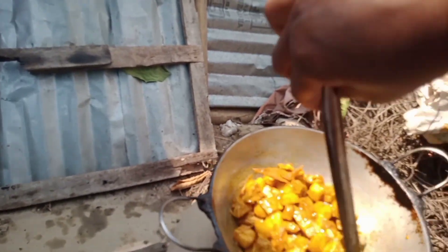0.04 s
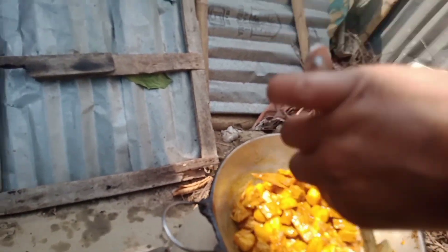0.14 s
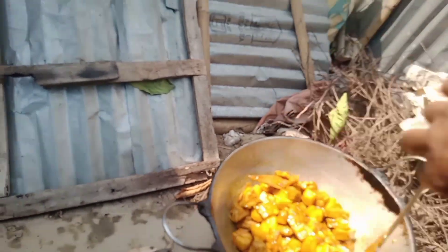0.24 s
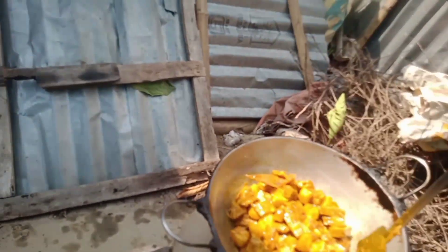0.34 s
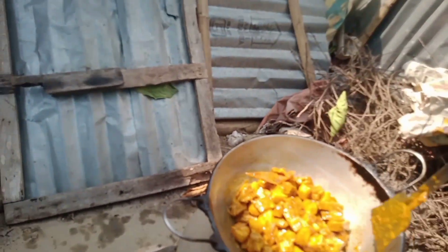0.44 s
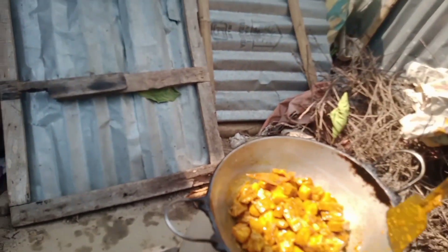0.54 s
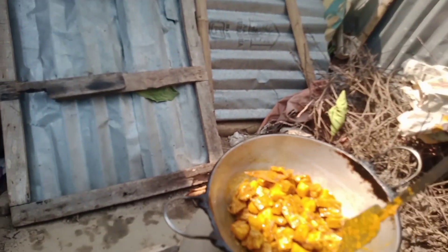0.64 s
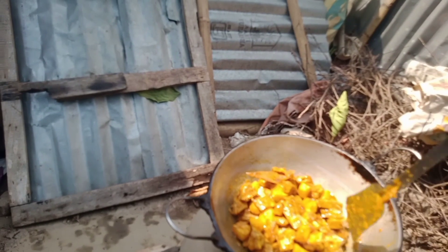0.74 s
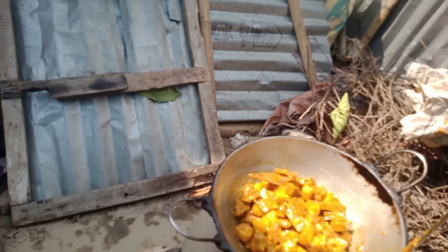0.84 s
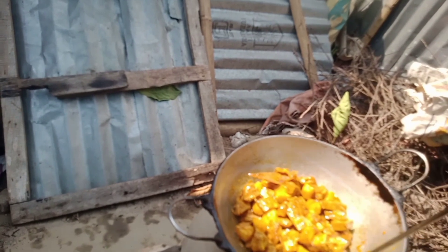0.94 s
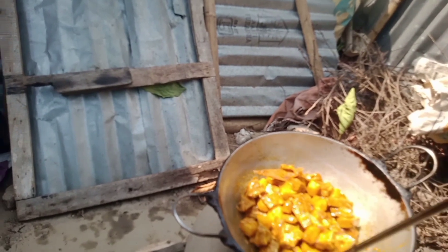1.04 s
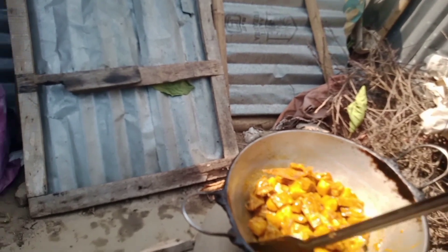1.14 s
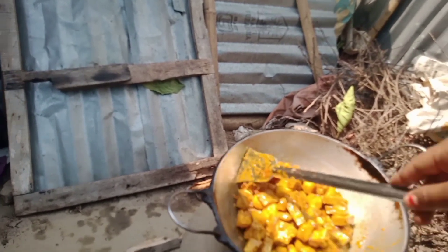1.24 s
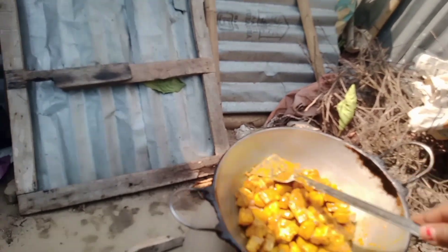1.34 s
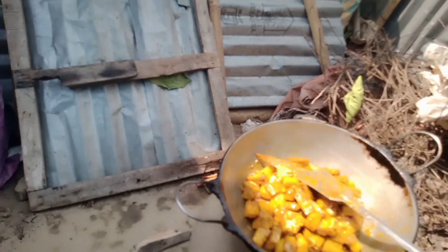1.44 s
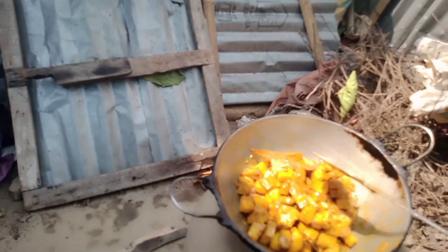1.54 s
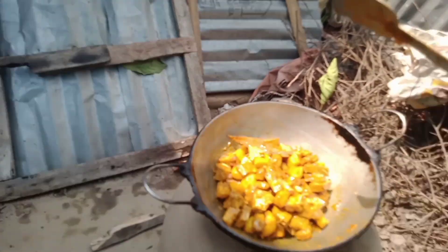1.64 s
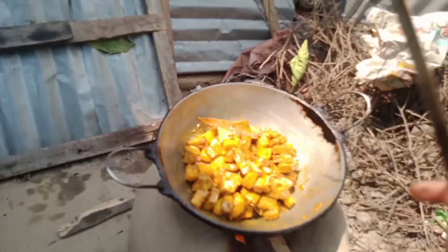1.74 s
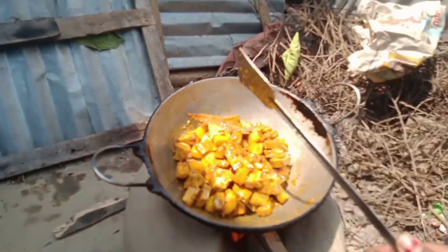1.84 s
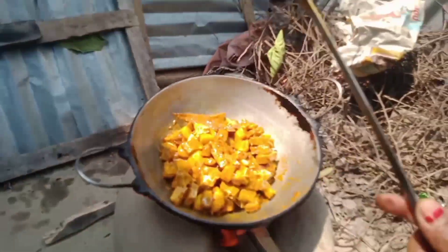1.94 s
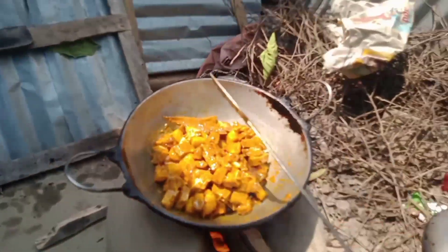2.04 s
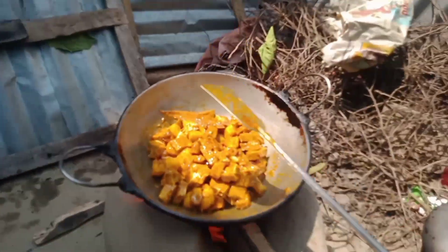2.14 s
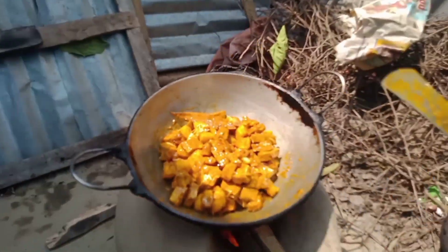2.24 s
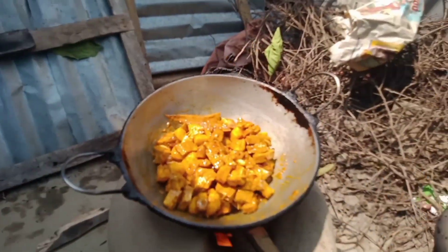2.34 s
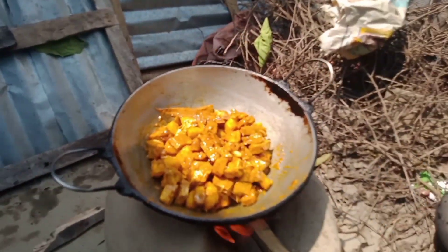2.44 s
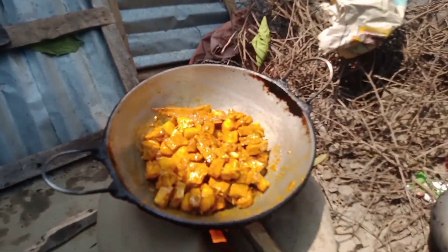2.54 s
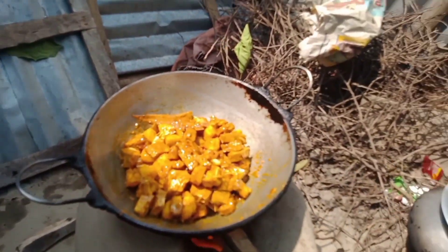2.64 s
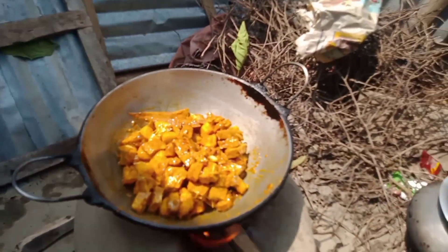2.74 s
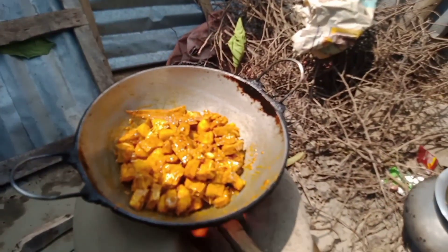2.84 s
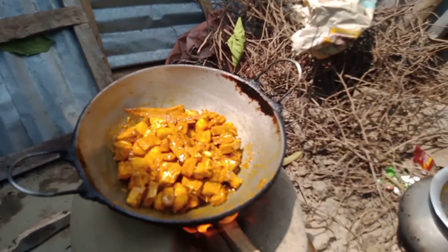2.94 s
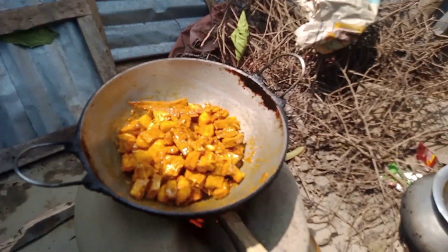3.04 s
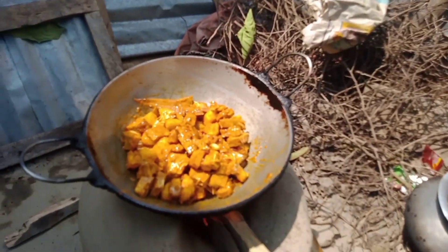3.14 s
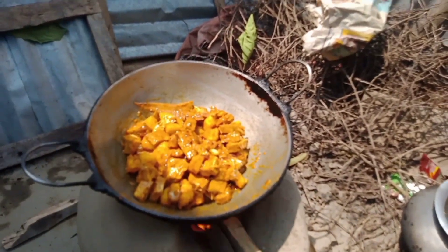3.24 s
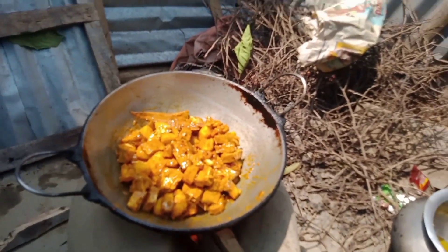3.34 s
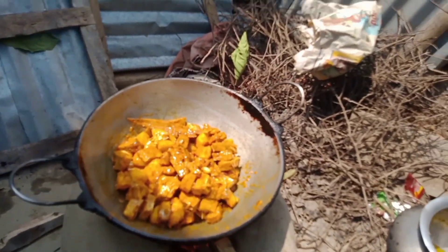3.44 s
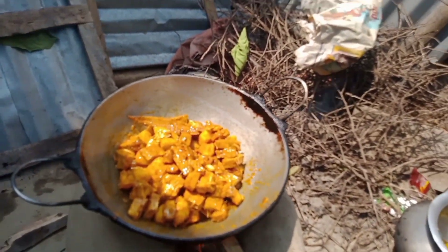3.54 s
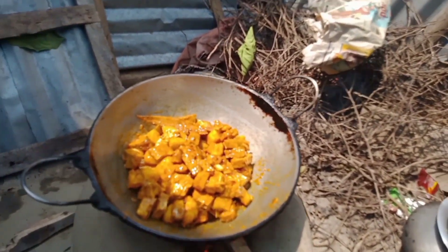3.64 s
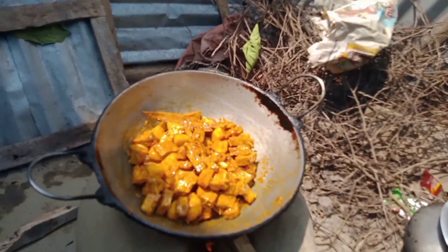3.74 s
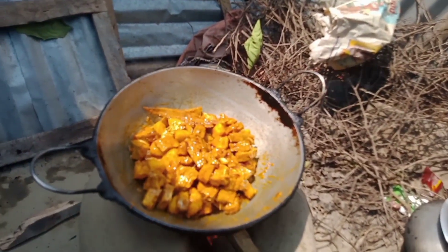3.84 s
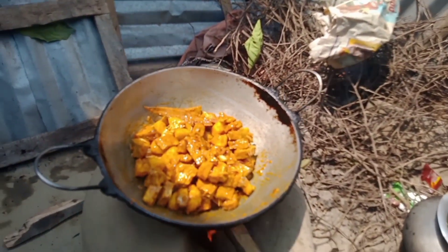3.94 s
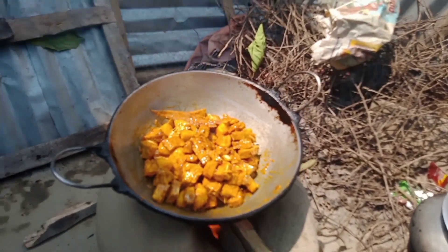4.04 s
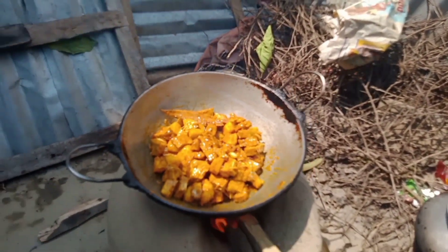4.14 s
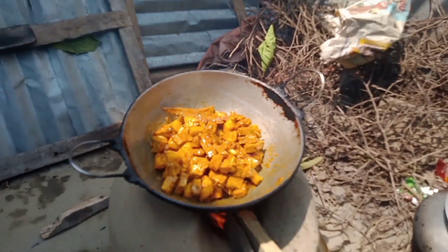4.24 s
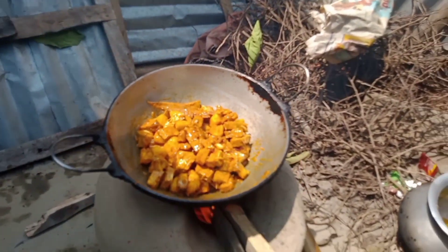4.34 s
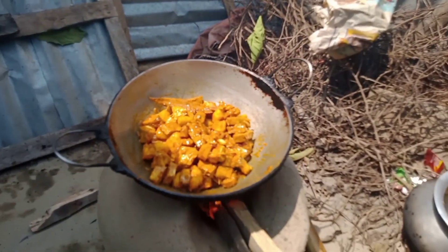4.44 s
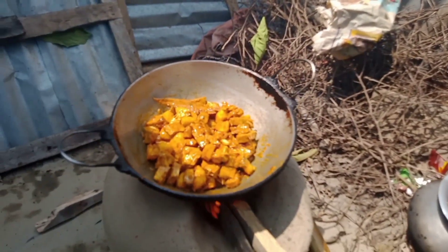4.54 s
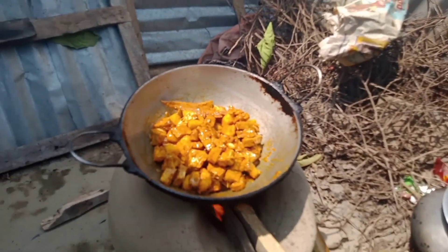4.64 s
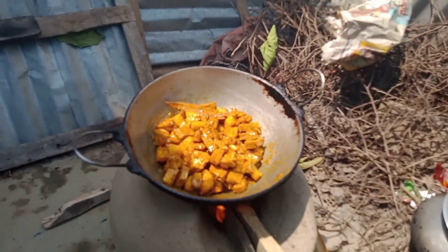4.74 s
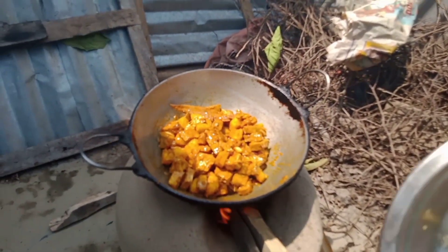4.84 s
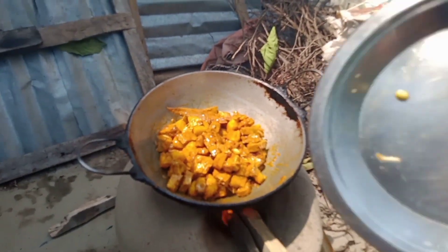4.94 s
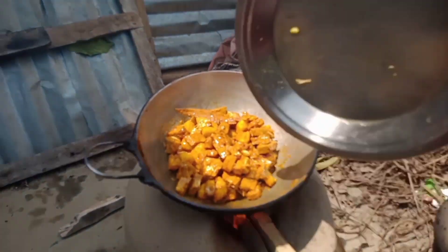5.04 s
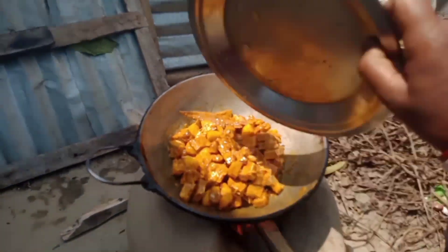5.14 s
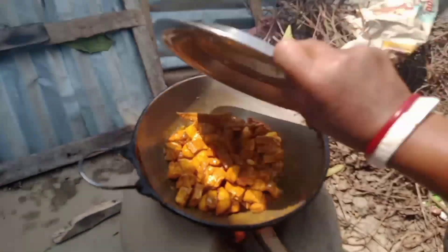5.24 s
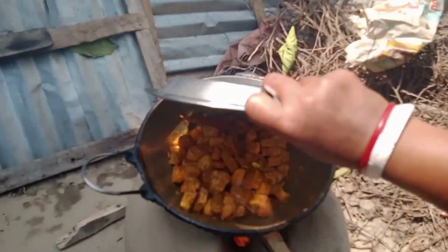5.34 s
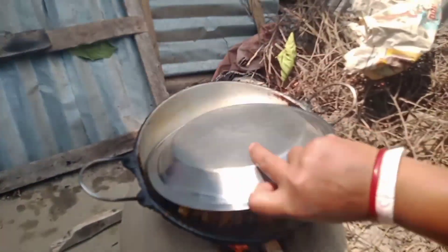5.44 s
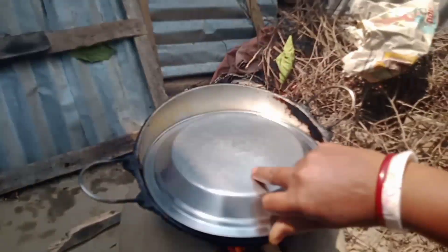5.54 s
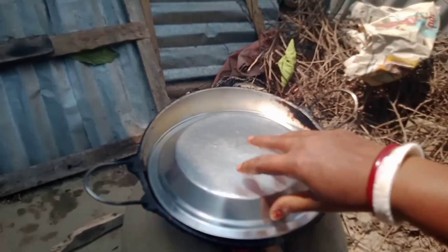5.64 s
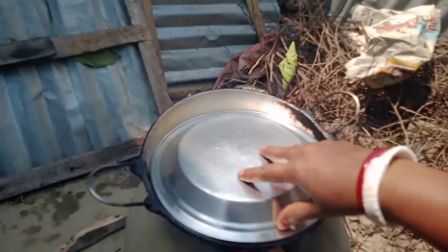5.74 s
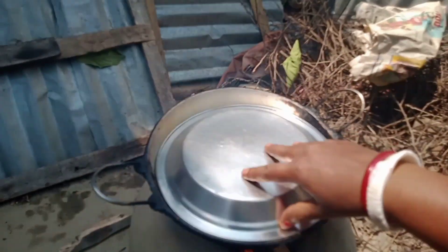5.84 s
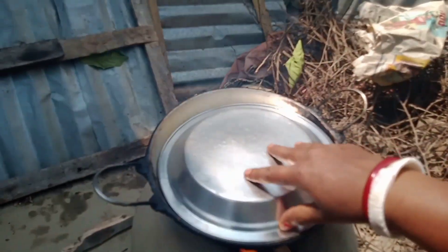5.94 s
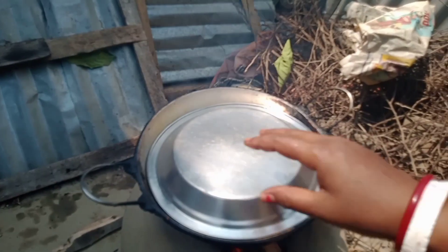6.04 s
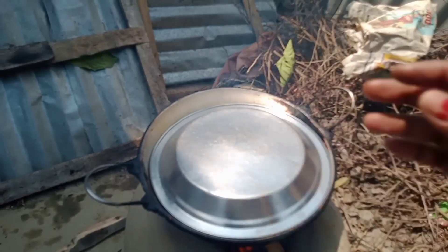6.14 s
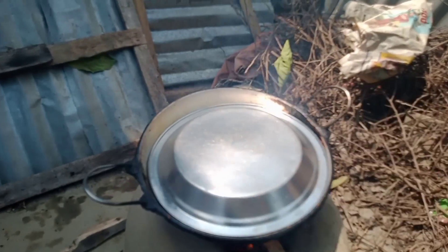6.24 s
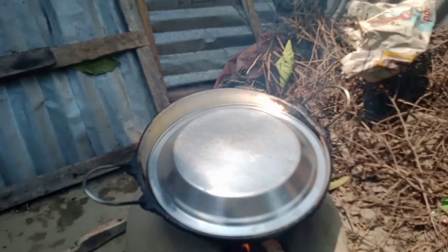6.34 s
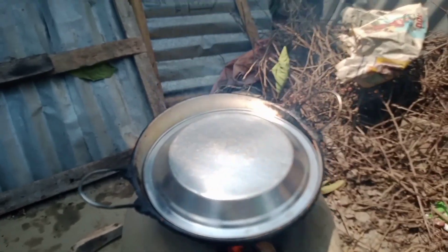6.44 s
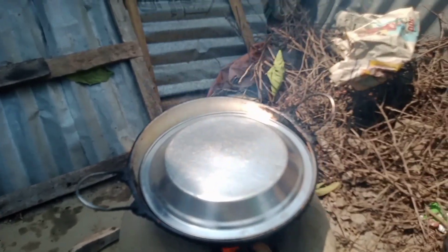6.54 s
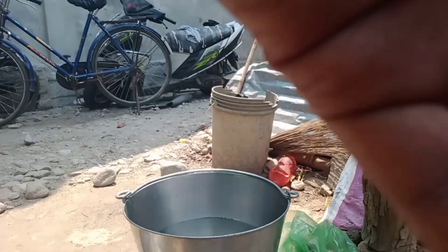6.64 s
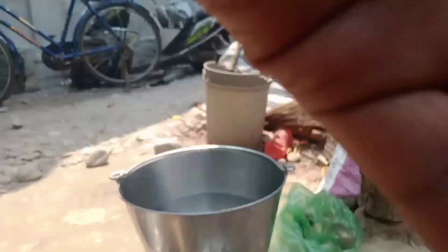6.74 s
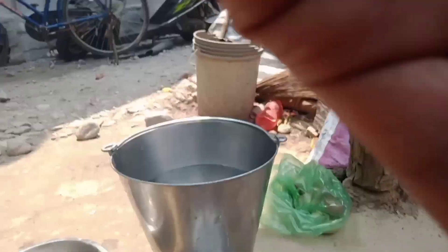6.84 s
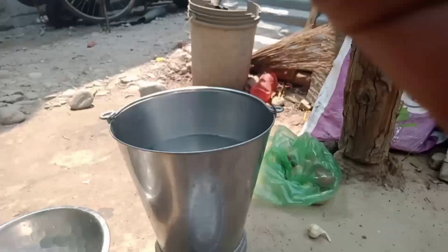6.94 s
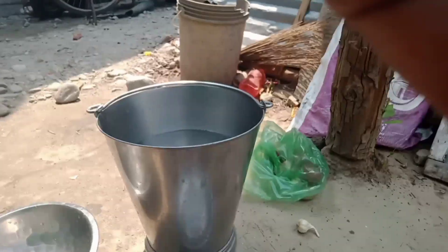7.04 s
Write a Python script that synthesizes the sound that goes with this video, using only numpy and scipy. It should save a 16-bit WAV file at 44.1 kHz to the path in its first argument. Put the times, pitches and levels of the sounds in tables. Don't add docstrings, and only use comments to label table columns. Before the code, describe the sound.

Outdoors, close and dry in mono, vegetables fry in a thin metal pan with a dense, crackling mid-bright sizzle over faint low fire and yard air. From 0 to about 1.6 seconds a spatula makes short scrapes, ticks and dull knocks, with frequent oil pops and a sharper freshly stirred hiss at the start. The frying then runs steadily, with tiny bright snaps, a small scrape and knock near 2.95 and a soft thud near 4.3. At 5.44 a metal plate knocks down; around 5.68-5.74 its edge drops, rocks rapidly and seats with short rings. The sizzle becomes quieter, hollow and resonant. From 5.8 to 6.65 a small bird gives eight short downward chips, generally getting lower. Everything cuts out at 6.67 for a tenth of a second, then a fuller, nearer hollow sizzle quickly fades in, with pops, a low thump near 6.97 and a tick near 7.1.

```python
import sys
import numpy as np
from scipy import signal
from scipy.fft import rfft, irfft, next_fast_len
from scipy.io import wavfile

SR = 44100
rng = np.random.default_rng(int(sys.argv[2]) if len(sys.argv) > 2 else 0)


def store_wav(level_fs):
    pcm = np.round(np.clip(np.atleast_2d(level_fs), -1, 1) * 32767)
    wavfile.write(sys.argv[1], SR, pcm.T.astype(np.int16))


def field_ratio(decibels):
    return 10 ** (np.asarray(decibels, dtype=float) / 20)


N = 312669
CUT_S, BACK_S = 6.6745, 6.78


def in_time(rows):
    s, *columns = np.transpose(rows)
    return [np.interp(np.arange(N) / SR, s, c) for c in columns]


def rms_one(x):
    return x / np.sqrt(np.mean(x ** 2) + 1e-20)


def add(out, s, x):
    i = round(s * SR)
    out[i:i + len(x)] += x[:N - i]


def swells(rows):
    out = np.zeros((len(rows[0]) - 2, N))
    for s, length_s, *db in rows:
        shape = np.hanning(round(length_s * SR)) ** 0.23
        for curve, top_db in zip(out, db):
            add(curve, s, top_db * shape)
    return out


def drift(rate_hz):
    step, settle = 40, 2000
    r = np.exp(-80 * np.pi * rate_hz / SR)
    noise = rng.standard_normal(N // step + settle + 2)
    slow = signal.lfilter([1], [1, -2 * r, r * r], noise)[settle:]
    return np.interp(np.arange(N) / step, np.arange(len(slow)), rms_one(slow))


def colour(x, spectrum, lo_hz, hi_hz):
    size = next_fast_len(N)
    hz = np.maximum(np.fft.rfftfreq(size, 1 / SR), 1)
    point_hz, point_db = np.transpose(spectrum)
    gain = field_ratio(np.interp(np.log(hz), np.log(point_hz), point_db))
    inside = (hz > lo_hz) & (hz < hi_hz)
    gain = gain / np.sqrt(np.sum(gain[inside] ** 2) / len(hz))
    return irfft(rfft(x, size) * gain, size)[:N]


def clicks(per_s, spread_db):
    out = np.zeros(N)
    born = np.flatnonzero(rng.random(N, np.float32) < per_s / SR)
    chance = rng.random(N, np.float32)[born] * 2 - 1
    size_db = spread_db * np.minimum(-np.log(abs(chance) + 1e-9), 4.5)
    out[born] = field_ratio(size_db) * np.sign(chance)
    return rms_one(out)


def hollow(x, modes):
    out, probe = x.copy(), 1 + np.zeros(512, complex)
    for hz, width_hz, level_db in modes:
        r = np.exp(-np.pi * width_hz / SR)
        b = field_ratio(level_db) * (1 - r * r) / 2 * np.array([1, 0, -1])
        a = [1, -2 * r * np.cos(2 * np.pi * hz / SR), r * r]
        out += signal.lfilter(b, a, x)
        probe += signal.freqz(b, a, np.linspace(1400, 4500, 512), fs=SR)[1]
    return out / np.sqrt(np.mean(np.abs(probe) ** 2))


def strike(hits, modes):
    out, t = np.zeros(N), np.arange(SR // 3) / SR
    for s, peak_db, contact_ms in hits:
        luck_db = rng.normal(0, 2.5, len(modes))
        ring = 0
        for (hz, db, t60_s), d in zip(modes, luck_db):
            softness = 1 + (hz * contact_ms / 1000) ** 2
            ring = ring + field_ratio(db + d) / softness * np.sin(2 * np.pi * hz * t) * field_ratio(-60 * t / t60_s)
        add(out, s, field_ratio(peak_db - 8) * ring * (1 - np.exp(-t * 300 / contact_ms)))
    return signal.sosfilt(signal.butter(3, 160, "high", fs=SR, output="sos"), out + 1e-18)


def ring_once(out, s, peak_db, hz, rise_s, t60_s):
    t = np.arange(SR // 2) / SR
    swell = np.sin(np.pi / 2 * np.minimum(t / rise_s, 1)) ** 2
    decay = field_ratio(-60 * np.maximum(t - rise_s, 0) / t60_s)
    add(out, s, field_ratio(peak_db) * swell * decay * np.sin(2 * np.pi * hz * t))


def fade_in_db():
    end_s, db_per_s, knee_s = 6.872, 421, 0.0049
    t = np.arange(N) / SR
    return -db_per_s * knee_s * np.logaddexp(0, (end_s - t) / knee_s)


def spatter(big_db, fine_db, finest_db):
    out, edges_hz = 0, 150 * 2 ** np.arange(0, 6.8, 1 / 3)
    surge_db = 0.067 * drift(4.8) + 1.0 * drift(100)
    cracks = clicks(250, spread_db=6.5)
    for low, high in zip(edges_hz, edges_hz[1:]):
        hz = np.sqrt(low * high)
        log_hz = np.log(hz)
        band = signal.butter(2, [low, high], "band", fs=SR, output="sos")
        bed = clicks(1.2 * hz * (1 + .17 * drift(40)), spread_db=3.0)
        single = clicks(.02 * hz, spread_db=0.5)
        single_share = np.interp(log_hz, np.log([500, 2500, 10000]), [.3, .45, .4])
        crack_share = np.interp(log_hz, np.log([600, 3000, 12000]), [.15, .35, .45])
        size = np.interp(log_hz, np.log([900, 1400, 3500, 7000, 12000]), [0, 1, 1, 2, 3])
        size_db = 0
        for k, curve_db in enumerate([big_db, 0, fine_db, finest_db]):
            size_db = size_db + max(1 - abs(size - k), 0) * curve_db
        bursts = bed + single_share * single + crack_share * cracks
        out = out + field_ratio(surge_db + size_db + 0.52 * drift(2.3)) * signal.sosfilt(band, bursts)
    return rms_one(out)


def sizzle():
    # (time [s], share [0-1])
    cover = [
        (5.42, 0.),
        (5.55, .3),
        (5.68, .4),
        (5.76, 1.),
    ]
    # (time [s], level [dB])
    fry = [(0, -38.5), (.2, -41), (.4, -42), (.9, -40), (1.25, -42.5), (1.55, -39), (1.84, -43.5),
           (2.37, -45), (2.7, -42.5), (3.1, -43), (3.79, -41), (4.4, -42), (5.1, -42), (5.5, -41.5),
           (5.66, -47), (5.8, -48.5), (6.3, -48.5), (6.67, -45.5)]
    # (start [s], length [s], louder [dB], finer [dB], coarser [dB])
    spells = [(0, 0.055, 0.5, 2, 1), (.09, 0.06, 2.5, -2.5, 0.5), (0, 0.3, 1, 1.5, -1),
              (.3, 0.13, 1.5, -3.5, -1.5), (.4, 0.24, 0, -1, -2), (.5, 0.35, 0.5, -1, -3.5),
              (.78, 0.22, .5, -1.5, -3), (1.105, 0.077, 3.5, -1.5, 1.5), (.21, .1, 0, 1, 1),
              (6.36, 0.097, 2.5, -2.5, -2.5), (6.5, 0.14, 1, -1, -3.5), (1.31, 0.23, -1.5, 3.5, 3.5),
              (1.42, 0.28, 0, 0.5, -0.5), (1.49, 0.043, 1, -0.5, -2), (2.2, 0.23, 0.5, -0.5, -2),
              (2.7, 0.13, 0.5, 1.5, 0.5), (2.92, 0.096, 1.5, -1, 6.5), (3.2, 0.2, 0.5, 1.5, 1.5),
              (3.84, 0.29, 1, -0.5, 0.5), (4.9, 0.13, 1, 0.5, 1), (5.08, 0.17, -2, 0, 2),
              (5.5, .1, -2, -2, 2.5), (5.77, 0.33, 1.5, -1, -1.5), (6.45, 0.12, 0, -0.5, -1),
              (6.8, 0.06, 2, -0.5, 2.5), (6.87, 0.04, -1, 0, 4.5), (6.91, 0.085, 1, 1.5, 2.5)]
    # (frequency [Hz], density [dB])
    open_spectrum = [(150, -57.5), (250, -16.5), (518, -11), (672, -3.5), (1070, -2), (1320, -1.5),
                     (1630, -3), (1780, -1.5), (2150, -1), (2790, -3.5), (3680, -4.5), (5880, -19),
                     (8610, -29), (10800, -38), (12400, -38.5), (13600, -40), (15000, -34.5),
                     (15450, -31.5)]
    shut_spectrum = [(120, -27), (200, -7), (350, -2), (800, -12), (1060, -7.5), (1290, -11.5), (1640, -2),
                     (2200, -5.5), (3500, -7.5), (6000, -21), (7600, -27), (8800, -27), (12300, -46.5),
                     (15000, -39), (15450, -38.5)]
    near_spectrum = [(120, -39), (200, -13), (706, -25), (1060, -3.5), (1490, -17), (1670, -10.5),
                     (2990, -11.5), (3340, -9), (3660, -16.5), (5370, -26.5), (15800, -47.5)]
    # (frequency [Hz], width [Hz], level [dB])
    bowl_air = [(706, 234, -3.5), (1216, 600, -5.5), (1800, 320, -1.5), (2244, 500, -3.5), (3130, 1040, -1),
                (8640, 590, -1)]
    # (frequency [Hz], width [Hz], level over edge leak [dB])
    lid_air = [(346, 100, -0.5), (1040, 150, 6.5), (1636, 104, 2.5), (2243, 79, 5), (2830, 170, 4.5),
               (3386, 104, 5.5), (4000, 110, -0.5), (4650, 120, -3), (5200, 130, -3.5), (5830, 110, -3),
               (6500, 109, -1)]
    near_air = [(351, 40, 11.5), (1088, 59, 2), (1750, 67, 4.3), (2330, 210, 8.6), (2960, 180, 11.7),
                (3700, 230, 11), (4160, 190, 9), (4670, 120, 4.1), (6000, 70, 4), (6600, 63, 4)]
    near_db, calm_db = -35.5, -43
    big_yield = 0.77
    sizes_db = (1.5, 1, 5), (3, -1, 0), (1, 0.5, -1.5)
    t = np.arange(N) / SR
    far = t < BACK_S
    shut, = np.clip(in_time(cover), 0, 1)
    fry_db, = in_time(fry)
    louder_db, finer_db, coarser_db = swells(spells)
    vigour_db = fry_db + louder_db
    big_db, fine_db, finest_db = (np.where(far, a + (b - a) * shut, c) for a, b, c in sizes_db)
    big_db = big_db + coarser_db - big_yield * (1 - shut) * (vigour_db - calm_db)
    grains = spatter(big_db, fine_db + finer_db, finest_db + 1.37 * finer_db)

    uncovered = colour(hollow(grains, bowl_air), open_spectrum, 1400, 4500)
    covered = colour(hollow(grains, lid_air), shut_spectrum, 1400, 4500)
    before = np.sqrt(1 - shut) * uncovered + np.sqrt(shut) * covered
    sharp_end_s, sharp_db = 0.312, -8.5
    sharp = signal.sosfilt(signal.butter(1, [2900, 5030], "band", fs=SR, output="sos"), before)
    before = before + field_ratio(sharp_db) * sharp * np.clip((sharp_end_s - t) / .015, 0, 1)
    after = colour(hollow(grains, near_air), near_spectrum, 1400, 4500)
    return np.where(far, field_ratio(vigour_db) * before, field_ratio(near_db + fade_in_db()) * after)


def pops():
    # (time [s], peak [dB])
    bursts = [(0.115, -18), (0.148, -20), (0.2495, -26), (0.79, -23), (0.823, -36), (0.9275, -21),
              (1.1364, -24), (1.164, -29), (1.2994, -25), (1.44, -22), (1.4586, -17.5), (1.5124, -20),
              (1.539, -26), (1.617, -33), (2.994, -22), (3.1048, -28), (3.411, -37), (3.678, -27.5),
              (3.9386, -21), (4.0348, -30), (6.885, -19), (6.943, -18), (7.0, -23), (0.543, -36),
              (1.1253, -33), (1.4197, -34), (1.8731, -39), (1.9098, -29), (1.936, -20), (2.2255, -33),
              (2.287, -26), (2.594, -34), (2.6334, -25), (2.8469, -32), (2.8863, -34), (3.1777, -35),
              (3.2, -30), (4.0028, -39), (4.2428, -27), (4.566, -21.5), (4.734, -28), (4.777, -27),
              (4.8893, -23), (4.9727, -21), (5.0404, -36)]
    out = np.zeros(N)
    for (s, peak_db), size in zip(bursts, np.resize([1, .7, 1.25], len(bursts))):
        ring_once(out, s, peak_db - 1.5, 2500 * size, rise_s=.00035, t60_s=0.0019)
    return out


def snaps():
    # (time [s], peak [dB], frequency [Hz])
    droplets = [(0.1426, -49, 8030), (0.1755, -52, 8480), (0.2294, -52, 8600), (0.979, -44, 10200),
                (1.1308, -49, 8430), (1.2271, -54, 8430), (1.3214, -53, 8400), (1.3389, -47, 8380),
                (1.4192, -44, 8510), (1.5349, -52, 8450), (1.5773, -50, 8250), (2.0368, -57, 8310),
                (2.1051, -47, 8420), (2.7417, -48, 8740), (2.7801, -53, 8490), (3.0106, -53, 8380),
                (3.1717, -55, 8460), (3.4665, -53, 8600), (3.8856, -50, 8550), (3.9474, -56, 8230),
                (3.9794, -51, 8110), (4.0841, -50.5, 8500), (4.155, -52, 8200), (4.2926, -55, 8140),
                (4.3375, -55, 8340), (4.6753, -55, 8390), (4.7132, -54, 8120), (4.9506, -52, 8460),
                (5.229, -53, 8880), (5.2684, -54, 8150), (5.465, -59, 8600), (5.4755, -54, 8300),
                (5.5154, -54, 8450), (5.5643, -52, 8790), (.7905, -32, 4600), (.7912, -44, 6600),
                (.8235, -25, 4000), (1.5124, -25, 4600), (1.352, -47, 8300), (1.362, -48, 8900),
                (1.373, -46, 8200), (1.383, -47, 8700), (1.394, -47, 8400), (1.4395, -33, 3600),
                (4.953, -42, 6850), (5.6825, -40, 5500), (5.7, -44, 7600), (5.712, -42, 5600)]
    out = np.zeros(N)
    for s, peak_db, hz in droplets:
        ring_once(out, s, peak_db, hz, rise_s=.0002, t60_s=.003)
    return out


def lid():
    # (time [s], peak [dB], contact [ms])
    landing = [
        (5.440, -33, .3),
        (5.452, -29, 0.25),
    ]
    seating = [
        (5.6828, -25, 0.26),
        (5.698, -28, 0.11),
        (5.707, -32, 0.1),
        (5.720, -38, 0.65),
        (5.738, -32, 0.53),
    ]
    # (frequency [Hz], level [dB], t60 [s])
    tilted = [(254, -9, 0.12), (543, 5.5, 0.2), (630, 9.5, 0.063), (1020, -5, 0.18), (1150, 2.5, 0.099),
              (1514, 2, 0.12), (2120, -17, .06)]
    seated = [(196, -13, 0.49), (344, -5, 0.12), (407, 2, 0.065), (461, 7.5, 0.074), (612, -2.5, 0.057),
              (840, -4, 0.079), (1090, -1, 0.1), (1180, -4, 0.075), (1630, -2, 0.054), (2550, -11, .04),
              (3540, -3, 0.041), (6400, -20, .1), (8950, -30, .03)]
    return strike(landing, tilted) + strike(seating, seated)


def scrapes():
    # (start [s], length [s], level [dB], brightness [dB per octave])
    strokes = [(0.02, 0.33, -56, -7), (0.668, 0.054, -51.5, -4), (0.977, 0.13, -46, 5.5),
               (1.094, 0.11, -49.5, 6), (1.199, 0.047, -61, -16), (1.268, 0.092, -65, 9),
               (1.326, 0.2, -49, 14), (1.474, 0.061, -55, 18), (2.936, 0.03, -49, -3),
               (2.98, 0.063, -51, -2), (5.439, 0.082, -44.5, 1), (5.679, 0.057, -39.5, -5)]
    # (frequency [Hz], level [dB], t60 [s])
    wall = [(180, -23, 0.085), (279, -4, 0.043), (384, 3.5, 0.064), (453, 12.5, 0.11), (650, -4, 0.09),
            (770, 11.5, 0.056), (970, 4.5, 0.22), (1110, -8.5, 0.14), (1337, 7.5, 0.15), (1600, 6.5, 0.16),
            (2033, 10.5, 0.1), (2760, 7.5, 0.045), (3220, -9, 0.054), (6150, -15, 0.033), (7250, -29, .015),
            (8600, -23, 0.013), (10300, -37, .012)]
    bright_top_hz, slips_per_s, size = 3500, 1500, SR // 3
    out = np.zeros(N)
    for s, length_s, level_db, bright_db in strokes:
        n = round(length_s * SR)
        slips = rng.standard_normal(size) * field_ratio(2.5 * rng.exponential(1, size))
        slips *= rng.random(size) < slips_per_s / SR
        slips[n:] = 1e-18
        slips[:n] *= np.sin(np.pi * np.linspace(0, 1, n) ** 0.55)
        rung = 0
        for hz, db, t60_s in wall:
            r, w = field_ratio(-60 / (t60_s * SR)), 2 * np.pi * hz / SR
            gain = field_ratio(db + bright_db * np.log2(min(hz, bright_top_hz) / 700)) * np.sin(w)
            rung = rung + signal.lfilter([0, gain], [1, -2 * r * np.cos(w), r * r], slips)
        add(out, s, field_ratio(level_db) * rung / np.std(rung[:n]))
    return signal.sosfilt(signal.butter(3, 170, "high", fs=SR, output="sos"), out + 1e-18)


def sharp_ticks():
    # (time [s], ring peak [dB], crack peak [dB], dullness [0-1])
    ticks = [(0.9785, -35.5, -34, 0.6), (1.339, -59, -45, 0.5), (1.375, -57, -44, .6),
             (1.535, -60, -48, .4), (2.94, -56, -44, .66), (2.9886, -52.5, -48, .6),
             (4.9501, -52, -54, .45), (5.44, -70, -36, 0.8), (5.6818, -62, -24.5, 0.77),
             (5.6974, -62, -26, 0.71), (5.709, -60, -26, 0.88), (.367, -75, -62, .1), (.79, -70, -41, 0.7),
             (.897, -75, -51, .2), (1.135, -70, -50, .4), (1.305, -75, -58, .1), (1.355, -62, -46, .6),
             (1.392, -60, -45, .62), (1.419, -60, -44, .62), (1.512, -70, -42, 1), (1.578, -70, -55, .3),
             (7.085, -68, -40, 0.7), (2.3146, -75, -59, .1), (2.7896, -75, -57, .1), (2.8185, -75, -59, .1),
             (3.0106, -75, -57, .1), (3.2066, -75, -55, .1), (3.4775, -75, -59, .1), (3.7554, -75, -56, .1),
             (4.4553, -89, -61, .1), (4.6254, -75, -56, .1), (4.7117, -75, -60, .1), (4.9841, -75, -53, .1),
             (5.0005, -75, -54, .1), (5.3592, -74, -49, .1), (5.4755, -70, -55, .3), (5.5154, -70, -52, .3),
             (.8225, -70, -42, 0.66), (2.09, -70, -46, .55), (5.6785, -70, -30, 1)]
    # (frequency [Hz], level [dB], t60 [s])
    blade = [(3220, -2, .03), (5300, -8, .04), (6110, -3, .07), (7400, -8, .05), (8400, -8, .05),
             (9200, -11, .05), (10200, -12, .05), (11300, -17, .03), (12600, -21, .03), (14200, -21, .03)]
    out = strike([(s, db, .02) for s, db, crack_db, dull in ticks], blade)
    t = np.arange(2000) / SR
    for s, db, crack_db, dull in ticks:
        low_pass = np.poly([np.clip(dull, 0, .9)] * 4)
        crack = signal.lfilter([1, -1], low_pass, rng.standard_normal(len(t)))
        add(out, s, field_ratio(crack_db - 10.5 - 60 * t / 0.027) * rms_one(crack))
    return out


def thuds():
    # (time [s], peak [dB], frequency [Hz], contact [ms])
    dull_knocks = [(.674, -45, 276, 1.5), (.675, -47, 422, 1.5), (.676, -49, 640, 3), (.773, -42, 95, 3),
                   (.976, -46, 260, 1.9), (.977, -46, 413, 1.2), (.995, -40, 420, 5.2),
                   (1.03, -47, 400, 4.4), (1.098, -48, 715, 4), (1.128, -43, 790, 4.5),
                   (1.201, -47, 272, 2.9), (1.218, -44.5, 225, 5), (1.37, -47, 6150, 3),
                   (1.415, -32.5, 1183, 8.8), (1.416, -35, 1610, 12), (2.938, -33, 770, 9.4),
                   (2.938, -40, 263, 2.1), (2.961, -48, 420, 8.9), (3.025, -39, 770, 5.6),
                   (4.313, -37, 164, 11.3), (5.41, -36, 1255, 12), (5.466, -22.5, 640, 21.5),
                   (5.47, -31.5, 1175, 11), (5.65, -36, 1150, 4), (5.899, -32.5, 400, 6.1),
                   (5.9, -36.5, 1040, 5.3), (6.968, -32, 121, 4.5), (6.965, -40, 500, 6.2),
                   (5.44, -45, 150, 7.1), (5.464, -29.5, 532, 9), (5.679, -30, 483, 1.3),
                   (4.314, -48, 75, 9), (2.96, -34, 1800, 5), (3.105, -38, 1960, 8)]
    out = np.zeros(N)
    for s, peak_db, hz, contact_ms in dull_knocks:
        ring_once(out, s, peak_db, hz, contact_ms / 1000, t60_s=0.038)
    return out


def rings():
    # (time [s], peak [dB], frequency [Hz], t60 [s])
    free_rings = [(.04, -48, 450, .48), (1.285, -47, 450, .15), (1.5, -51.5, 450, .18),
                  (1.365, -39.5, 2750, .12), (1.39, -47, 762, .45), (2.98, -42, 825, .1),
                  (4.29, -43.5, 1000, .25), (4.33, -43.5, 181, .11), (5.742, -36, 390, .3),
                  (5.75, -46, 366, .3), (5.722, -34, 470, .1), (5.714, -28, 345, .07),
                  (5.706, -30, 1170, .07), (5.736, -33, 435, .08), (6.788, -62, 1050, .5),
                  (5.698, -52, 6400, .05), (5.709, -53, 6850, .025), (5.698, -43, 3540, .025),
                  (5.753, -48, 3540, .15), (5.6845, -36, 2600, .02)]
    out = np.zeros(N)
    for s, peak_db, hz, t60_s in free_rings:
        ring_once(out, s, peak_db, hz, 0.0336 * t60_s, t60_s)
    return out


def bird():
    # (time [s], peak [dB], start frequency [Hz])
    chips = [(5.826, -43, 2900), (5.939, -40.5, 2500), (6.061, -42, 2550), (6.182, -44, 2620),
             (6.288, -45, 2090), (6.41, -51, 1900), (6.524, -44.5, 1820), (6.630, -40, 1930)]
    rest_hz, start_share, cycles = 1007, 0.11, 33.7
    out = np.zeros(N)
    for s, peak_db, start_hz in chips:
        end_hz = rest_hz + start_share * start_hz
        n = round(cycles * SR / np.sqrt(start_hz * end_hz))
        phase = 2 * np.pi * np.cumsum(np.geomspace(start_hz, end_hz, n)) / SR
        add(out, s, field_ratio(peak_db) * np.hanning(n) ** 0.63 * np.sin(phase))
    return out


def yard():
    # (frequency [Hz], density [dB])
    air_spectrum = [(18, -49), (36, -20), (60, -11.5), (167, -11.5), (344, -15.5), (412, -9), (522, -20.5),
                    (700, -11.5), (910, -15), (1540, -120)]
    # (start [s], length [s], level over the yard [dB])
    puffs = [(0, 0.099, 11), (.45, 0.48, 3.5), (1.3, 0.24, 0.5), (1.8, 1, -3.5), (2.95, 0.16, 6.5),
             (2.4, 0.36, 6), (3.6, 0.2, -3), (4.7, 0.36, 5.5), (5, 0.15, -10), (5.55, .13, 3),
             (5.75, 0.23, 7), (5.27, .16, 0), (.95, .3, -1), (3.25, 0.3, 3), (6.2, 0.25, 3),
             (6.94, 0.078, 3)]
    far_db, near_db = -66, -49.5
    gusts_db = 3.9 * drift(5.8) + 1.74 * drift(25) + swells(puffs)[0]
    far = np.arange(N) / SR < BACK_S
    level_db = np.where(far, far_db, near_db + 0.85 * fade_in_db()) - 4.5
    return field_ratio(level_db + gusts_db) * colour(rng.standard_normal(N), air_spectrum, 40, 333)


def scene():
    frying = sizzle() + pops() + snaps()
    metal = lid() + scrapes() + sharp_ticks() + thuds() + rings()
    return (frying + metal + bird() + yard())[None]


def top_cut(x):
    return signal.sosfilt(signal.butter(12, 16040, fs=SR, output="sos"), x)


def record(dry):
    t = np.arange(N) / SR
    on = np.clip(np.maximum((CUT_S + .0005 - t) / .001, (t - BACK_S) / .01), 0, 1) ** 2
    band = signal.sosfilt(signal.ellip(12, .5, 50, 15490, fs=SR, output="sos"), dry * on)
    return top_cut(band)


dry = scene()
out = record(dry)
store_wav(out)
```